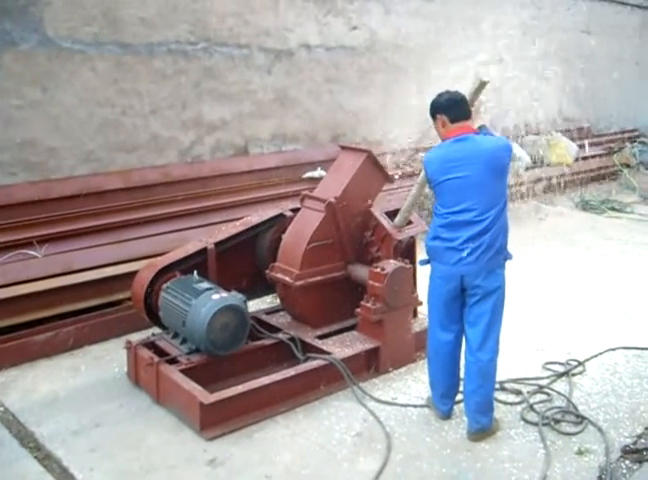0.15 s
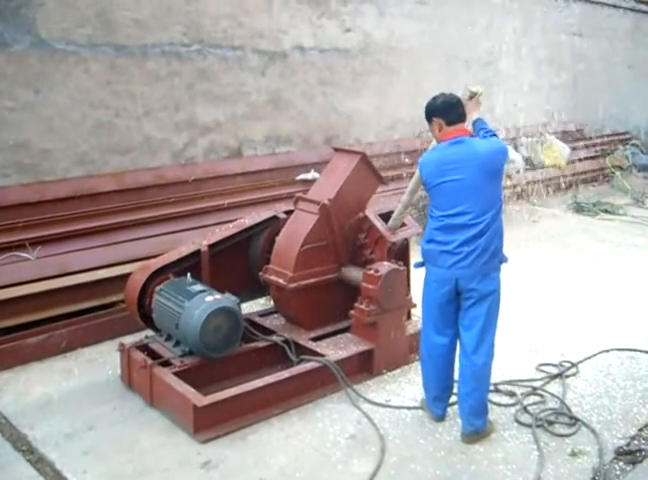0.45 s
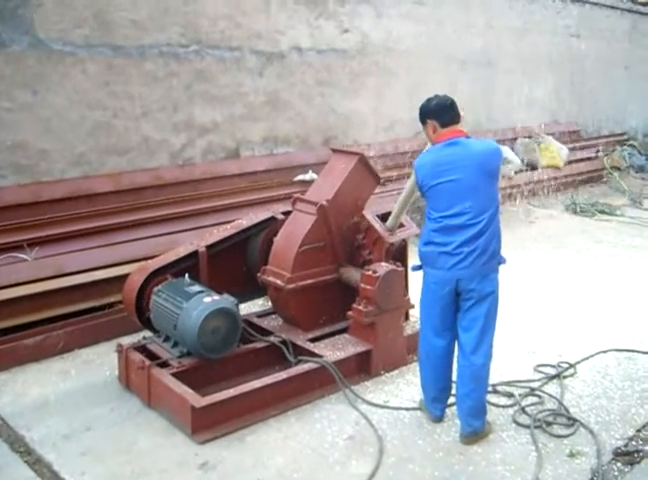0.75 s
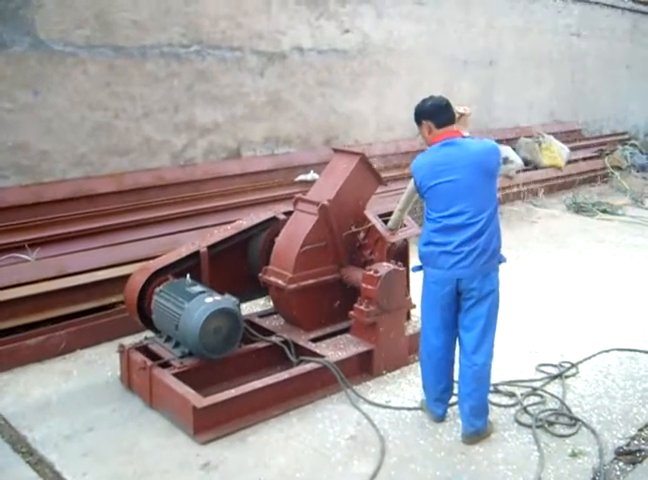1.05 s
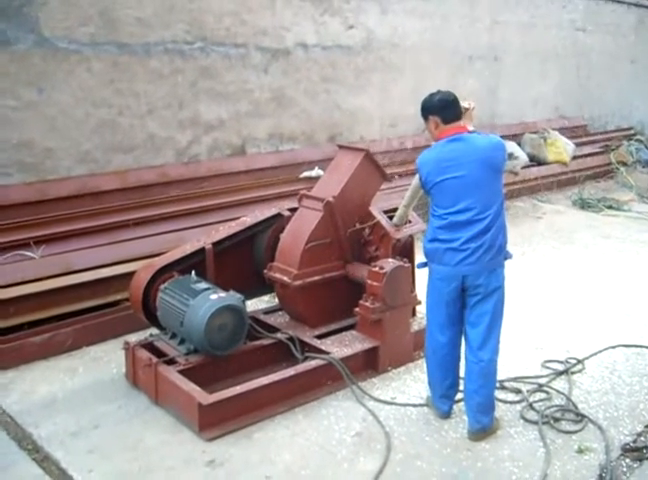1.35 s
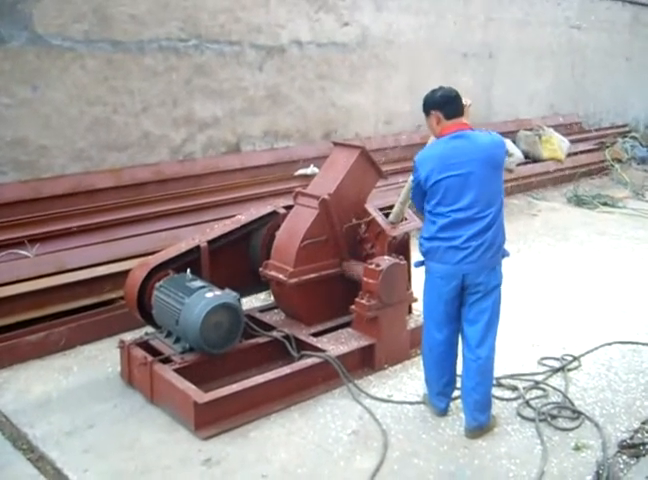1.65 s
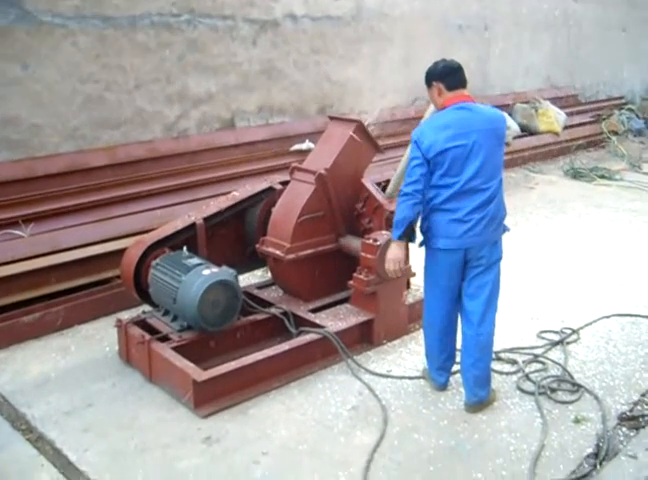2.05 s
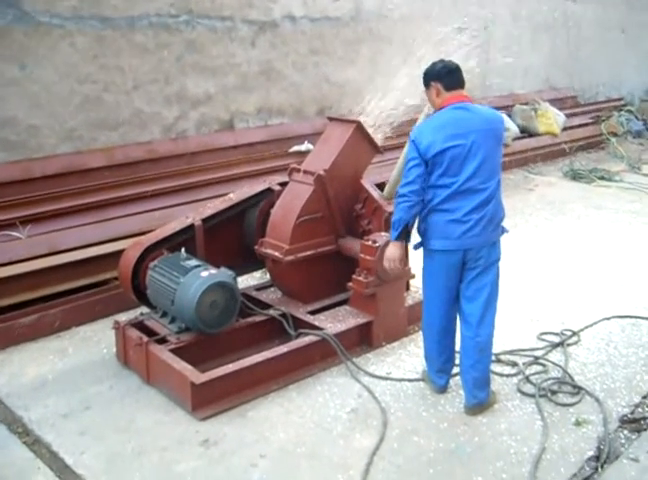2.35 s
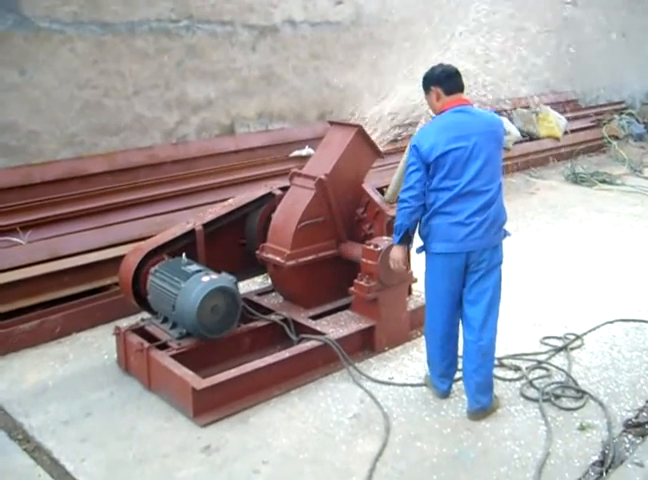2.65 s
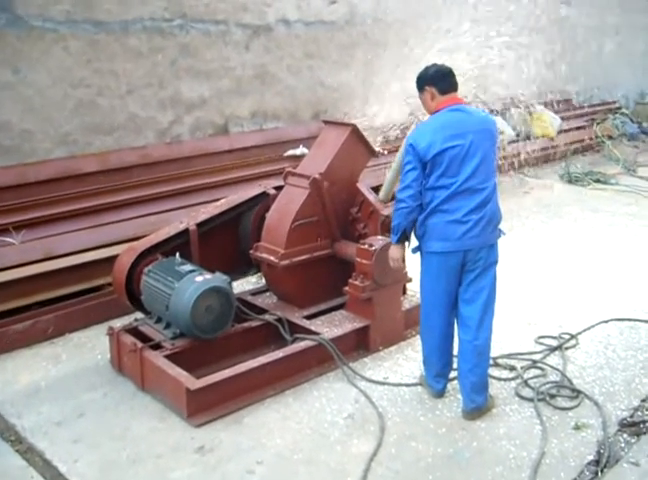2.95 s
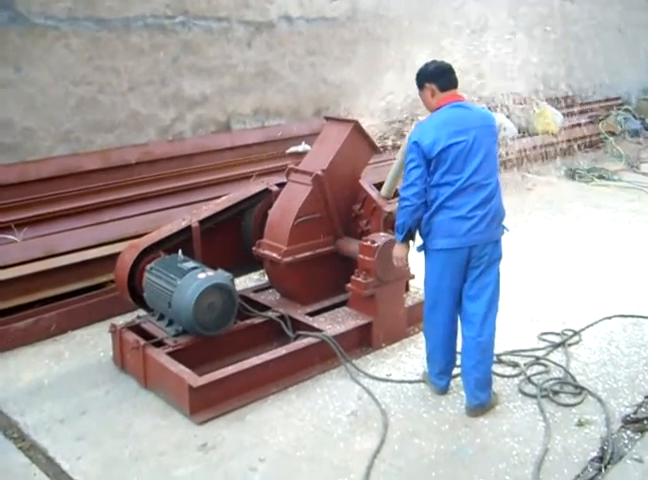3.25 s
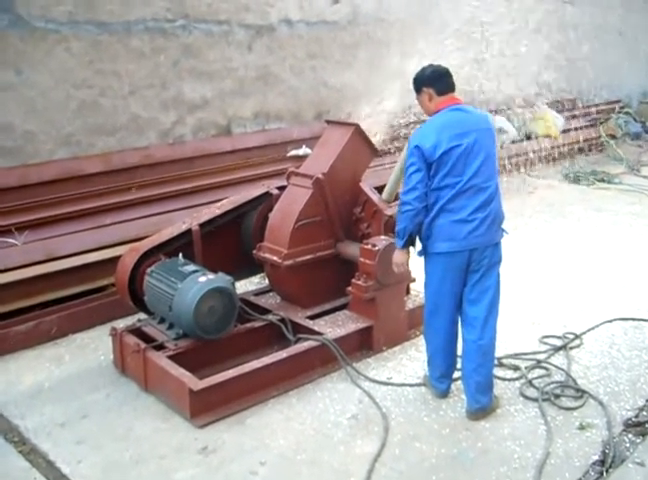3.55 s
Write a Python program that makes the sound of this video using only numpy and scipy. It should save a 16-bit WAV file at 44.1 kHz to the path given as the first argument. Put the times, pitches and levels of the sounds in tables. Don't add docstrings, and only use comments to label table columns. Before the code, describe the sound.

A wood chipper idles in a walled concrete yard, its last cut fading over the first half second under steady motor hum, fluttering air and bearing rattle. A log knocks loudly on the chute at 0.4 s and echoes. Faint chip ticks come from 1.5 s. At 2.0 s rapid knife blows roar until the end near 3.7 s, bright then deeper, with ringing steel and flying chips, on a distorted narrow-band microphone.

```python
import sys
import numpy as np
from scipy import signal
from scipy.fft import rfft, irfft, next_fast_len
from scipy.io import wavfile
from scipy.ndimage import uniform_filter1d, map_coordinates

SR = 44100
rng = np.random.default_rng(int(sys.argv[2]) if len(sys.argv) > 2 else 0)


def level_to_linear(level):
    exponent = np.asarray(level, float) / 20
    return 10 ** exponent


def materialize(psi):
    bounded = np.clip(np.atleast_2d(psi).T, -1, 1)
    quanta = np.round(bounded * 32767).astype(np.int16)
    wavfile.write(sys.argv[1], SR, quanta)


N = 164052

IDLE_TURNS, CUT_TURNS = 13.86, 13.75
FIRST_BITE_S = 2.0405
KNIVES = [0, -5, 1]


def unit(x):
    return x / np.sqrt(np.mean(x ** 2) + 1e-20)


def along(points, hz):
    f, v = np.transpose(points)
    return np.interp(np.log(hz + 1), np.log(f + 1), v)


def curve(rows):
    return np.interp(np.arange(N) / SR, *np.transpose(rows))


def wobble(rate):
    knots = rng.standard_normal(int(N * rate / SR) + 4)
    return map_coordinates(knots, [np.arange(N) * rate / SR])


def filtered(x, response):
    m = next_fast_len(N + SR // 2)
    return irfft(rfft(x, m) * response(np.fft.rfftfreq(m, 1 / SR)), m)[..., :N]


def coloured(x, points):
    return unit(filtered(x, lambda hz: level_to_linear(along(points, hz))))


def sine(cycles):
    return np.sin(2 * np.pi * (cycles + rng.random()))


def knife_passes():
    t = np.arange(N) / SR - FIRST_BITE_S
    return len(KNIVES) * t * np.where(t < 0, IDLE_TURNS, CUT_TURNS)


def blow_sizes(passes):
    # t/s, peak level/dB
    crunches = [(2.0444, -1), (2.0873, -9), (2.1142, 1.5), (2.1865, 1), (2.2319, -3.5), (2.3048, -6.5),
                (2.3791, -9.5), (2.4055, -5.5), (2.4514, -5), (2.5507, 1.5), (2.6231, 1), (2.6954, -0.5),
                (2.7697, 0), (2.8416, -8), (2.885, 1.5), (2.9583, -3.5), (2.9877, -5), (3.0621, -5.5),
                (3.1094, -3.5), (3.1818, -7.5), (3.2042, -7.5), (3.2511, -3), (3.3978, -7), (3.4721, -1.5),
                (3.5455, -7), (3.6258, -4)]
    blow = np.floor(passes).astype(int)
    first = blow.min()
    extra_db = 1.5 * rng.standard_normal(blow.max() - first + 1)
    s, peak_db = np.transpose(crunches)
    hard = np.round(passes[(s * SR).astype(int)]).astype(int) - first
    extra_db[hard] += 4.5 + 0.65 * (peak_db - peak_db.mean())
    return level_to_linear(np.take(KNIVES, blow % len(KNIVES)) + extra_db[blow - first])


def tearing_gate(passes, size):
    rise_s, tear_s, rest = 0.0023, 0.015, 0.24
    since_s = (passes - np.floor(passes)) / (len(KNIVES) * CUT_TURNS)
    return unit(rest + size * np.exp(-since_s / tear_s) * (1 - np.exp(-since_s / rise_s)))


def torn_wood(passes, size, gate, depth):
    # f/Hz, level/dB per Hz
    thin = [(45, -35.5), (95, -14), (300, -15.5), (900, -6.5), (1500, -17), (2300, -8.5), (3500, -27),
            (6000, -17.5)]
    # f/Hz, level/dB per Hz
    thick = [(45, -50.5), (95, -13), (400, -2), (590, -11), (1200, 3), (1950, -10.5), (5100, -19),
             (6000, -35.5)]
    blow = np.floor(passes)
    strikes = size * (np.diff(blow, prepend=blow[0]) > 0)
    thumps = unit(filtered(strikes, lambda hz: 1 / (1 + 1j * hz / 500) ** 2))
    fibres = gate * level_to_linear(0.79 * wobble(14)) * rng.standard_normal(N)
    drive = fibres + level_to_linear(-19.5) * thumps
    return unit(np.sqrt(1 - depth) * coloured(drive, thin) + np.sqrt(depth) * coloured(drive, thick))


def plates(hz):
    # f/Hz, width/Hz, level/dB
    housing = [(330, 16, -12), (452, 14, -7), (490, 22, -1), (540, 16, -7), (646, 28, -9), (755, 22, -9),
               (826, 30, -8), (908, 40, -5), (1017, 34, -6), (1140, 55, -2), (1238, 36, -3), (1352, 30, -6),
               (1692, 45, -11), (2310, 140, -12)]
    total = 0
    for k, (centre, width, db) in enumerate(housing):
        mode = 1j * hz * width / (centre * centre - hz * hz + 1j * hz * width)
        total = total + (-1) ** k * level_to_linear(db) * mode
    return total


def housing_ring(gate, depth):
    return level_to_linear(-3.5) * (0.22 + depth) * unit(filtered(gate * rng.standard_normal(N), plates))


def disc_shake(passes):
    # multiple of turns, level under the cut/dB
    disc_tones = [(7, -35), (10, -16.5), (11, -18), (15, -13.5), (17, -17), (20, -28)]
    turns = passes / len(KNIVES)
    return sum(level_to_linear(db + 0.67 * wobble(7)) * sine(m * turns) for m, db in disc_tones)


def splinter_spray(gate, depth):
    # f/Hz, level/dB per Hz
    spray = [(1200, -27), (2000, -3), (3500, -8.5), (5100, 2.5), (6000, -0.5)]
    return level_to_linear(-17) * (2.4 - depth) * coloured(gate ** 1.46 * rng.standard_normal(N), spray)


def chips(count):
    centre_hz, spread, decay_cycles = 3747, 0.327, 14
    when, pitch = rng.random(count), rng.standard_normal(count)
    size_db = 3.5 * np.minimum(rng.exponential(size=count), 3.5)
    hz = np.clip(centre_hz * np.exp(spread * pitch), 2200, 5400)[:, None]
    t = np.arange(SR // 50) / SR
    pings = level_to_linear(size_db)[:, None] * np.sin(2 * np.pi * hz * t) * np.exp(-t * hz / decay_cycles)
    at = (when * N).astype(int)[:, None] + np.arange(len(t))
    return unit(np.bincount(at.ravel(), pings.ravel())[:N])


def cutting():
    # t/s, level/dB
    bite = [(1.85, -42.5), (1.99, -25.5), (2.015, -12.5), (2.03, -12), (2.05, -6), (2.2, -10.5),
            (2.3, -7.5), (2.45, -9.5), (2.55, -8.5), (2.61, -11), (2.65, -4.5), (2.8, -7.5), (3.1, -6.5),
            (3.2, -9), (3.37, -6.5), (3.45, -7.5), (3.72, -2.5)]
    # t/s, share 0-1
    thickness = [(0, 0.1), (2.1, .1), (2.5, 0.2), (2.8, 0.1), (3.2, 0.9), (3.72, 1)]
    passes = knife_passes()
    size = blow_sizes(passes)
    gate = tearing_gate(passes, size)
    depth = np.clip(curve(thickness), 0, 1)
    wood = torn_wood(passes, size, gate, depth)
    steel = housing_ring(gate, depth) + disc_shake(passes)
    debris = splinter_spray(gate, depth) + level_to_linear(-17.5) * gate * chips(count=900)
    return level_to_linear(curve(bite)) * unit(wood + steel + debris)


def knocks():
    # t/s, peak level/dB
    strikes = [
        (0.43, 1.5),
        (1.995, -15),
        (2.012, -13),
    ]
    # f/Hz, level/dB, t60/s
    modes = [(415, 1, .07), (500, 6, .045), (651, 3, .11), (690, 1, .1), (857, -2, .12), (995, -5, .12),
             (1217, 2, .12), (1510, -5, .16), (1594, -5, .16), (1903, -4, .12), (2117, -9, .1),
             (3240, -14, .06)]
    # f/Hz, level/dB per Hz
    body = [(250, -34), (420, 6), (700, -6), (1250, -8), (2000, -10), (2500, -16.5), (5000, -26),
            (6000, -35)]
    body_db, body_t60_s, rise_s = -11, 0.16, 0.0005
    out, t = np.zeros(N + SR), np.arange(SR // 4) / SR
    for s, db in strikes:
        ring = np.zeros(len(t))
        for hz, level, t60 in modes:
            ring += level_to_linear(level + rng.normal(0, 1) - 60 * t / t60) * np.sin(2 * np.pi * hz * t)
        rattle = coloured(rng.standard_normal(N), body)[:len(t)]
        crack = level_to_linear(body_db - 60 * t / body_t60_s) * rattle
        knock = (ring / np.abs(ring).max() + crack) * (1 - np.exp(-t / rise_s))
        out[round(s * SR):][:len(t)] += level_to_linear(db) * knock
    return out[:N]


def ticks():
    # t/s, peak level/dB, f/Hz
    pings = [(1.468, -25.5, 2890), (1.49, -29.5, 1930), (1.712, -30.5, 3760), (1.714, -32, 5240),
             (1.716, -28, 1930), (1.945, -24.5, 2520), (1.993, -25, 3230), (2.014, -23, 4850),
             (2.232, -8, 3113), (2.258, -12.5, 2800)]
    t60_s = 0.037
    out, t = np.zeros(N + SR), np.arange(SR // 10) / SR
    for s, db, hz in pings:
        rough = 1.2 + 5 * uniform_filter1d(rng.standard_normal(len(t)), size=20)
        out[round(s * SR):][:len(t)] += level_to_linear(db - 60 * t / t60_s) * rough * np.sin(2 * np.pi * hz * t)
    return out[:N]


def beaten_air(passes):
    # t/s, level/dB
    idle_level = [(0.55, -23), (1.414, -22.5), (1.422, -24), (1.9, -22.5)]
    # f/Hz, level/dB per Hz
    air_colour = [(22, -23), (127, -15), (330, -14), (550, -22), (800, -15), (1000, -19), (4450, -34.5),
                  (6000, -45.5)]
    # f/Hz, level/dB per Hz
    hiss = [(1500, -27.5), (2500, 4.5), (4000, -14), (6000, 6.5)]
    t, swell = np.arange(N) / SR, np.cos(2 * np.pi * passes)
    beat = level_to_linear(0.67 * swell + 0.8 * wobble(9.44))
    air = coloured(beat * rng.standard_normal(N), air_colour)
    rattle_db = -16 - 1.5 * t + 2.7 * swell + 3 * wobble(11)
    rattle = level_to_linear(rattle_db) * coloured(rng.standard_normal(N), hiss)
    return level_to_linear(curve(idle_level) - 0.5) * (air + rattle)


def knife_tones(passes):
    # multiple of knife rate, level/dB
    tones = [(2, -43), (3, -36.5), (4, -54), (6, -39), (8, -36), (9, -37.5), (10, -41.5), (11, -40.5),
             (12, -50.5)]
    return sum(level_to_linear(db + 2.5 * wobble(3.9)) * sine(k * passes) for k, db in tones)


def motor_hum():
    # f/Hz, level/dB
    lines = [(300, -25), (275, -36), (318, -38), (649, -45), (863, -42), (947, -42), (1038, -43),
             (1092, -39), (1148, -46)]
    t = np.arange(N) / SR
    return sum(level_to_linear(db + wobble(6)) * sine(hz * t + 0.00013 * hz * wobble(8)) for hz, db in lines)


def idle():
    passes = knife_passes()
    return beaten_air(passes) + np.sqrt(2) * (knife_tones(passes) + motor_hum())


def last_cut():
    # f/Hz, level/dB per Hz
    colour = [(35, -34.5), (60, -16), (374, -7.5), (540, -15), (1140, -18.5), (1710, -28.5), (5040, -35),
              (6000, -39), (7800, -78), (13200, -120)]
    level_db, t60_s = -12, 0.57
    fade = level_to_linear(level_db - 60 * np.arange(N) / SR / t60_s + 2.2 * wobble(52))
    return fade * coloured(rng.standard_normal(N), colour)


def yard(x):
    # f/Hz, t60/s
    decay = [(200, 0.93), (1500, 0.73), (6000, 0.46)]
    hz, t, z = signal.stft(rng.standard_normal(SR // 2), SR, nperseg=256)
    tail = signal.istft(z * level_to_linear(-60 * t / along(decay, hz)[:, None]), SR, nperseg=256)[1]
    return signal.fftconvolve(np.pad(x, (500, 0)), tail / np.linalg.norm(tail))[:N]


def scene():
    work = cutting() + knocks() + ticks()
    return (idle() + last_cut() + work + level_to_linear(-6) * yard(work))[None]


def top_cut(x):
    return signal.sosfilt(signal.butter(12, 15830, fs=SR, output="sos"), x)


def record(dry):
    # f/Hz, level/dB
    band = [(4400, 2.5), (5000, 3.5), (5400, 0.5), (5800, -10), (6150, -27.5), (6400, -120)]
    step, first_top, second_top = 4, 0.68, 0.703
    low = filtered(dry, lambda hz: hz < SR / step / 2)
    low = np.clip(low, -first_top, first_top)
    pulses = step * low * (np.arange(N) % step == 0)
    full = filtered(pulses, lambda hz: level_to_linear(along(band, hz) - band[0][1]))
    return top_cut(np.clip(full, -second_top, second_top))


dry = scene()
out = record(dry)
materialize(out)
```